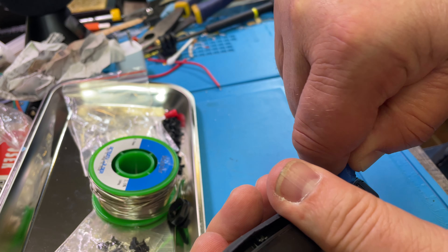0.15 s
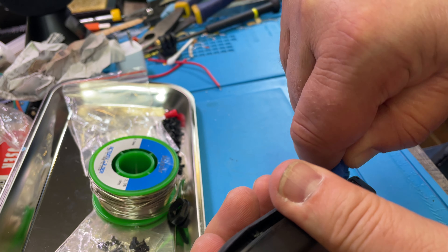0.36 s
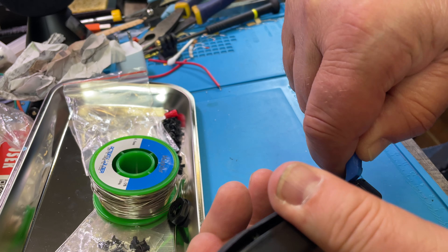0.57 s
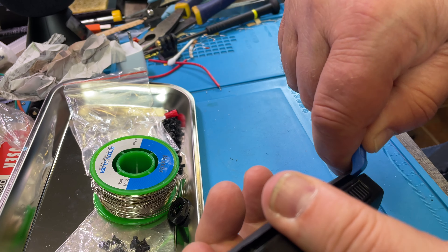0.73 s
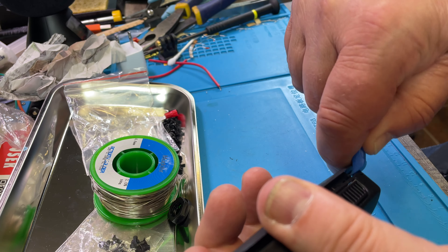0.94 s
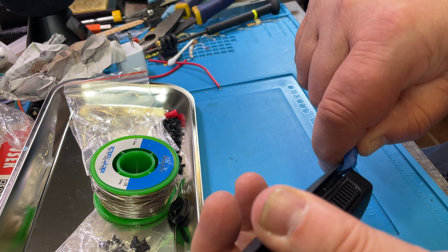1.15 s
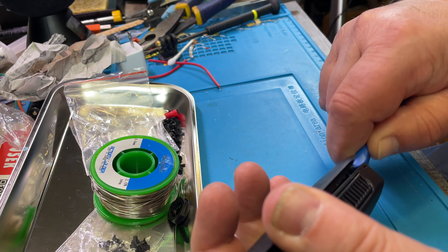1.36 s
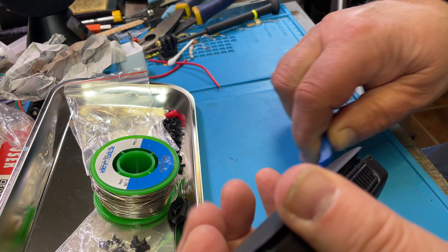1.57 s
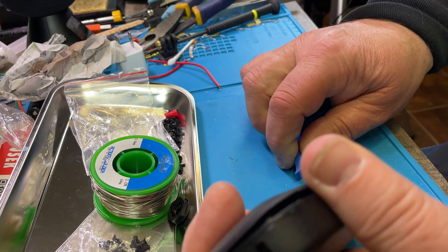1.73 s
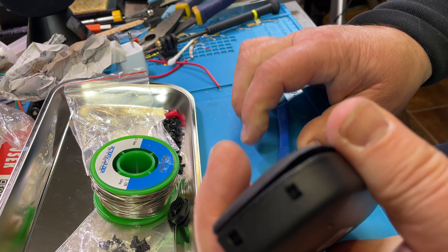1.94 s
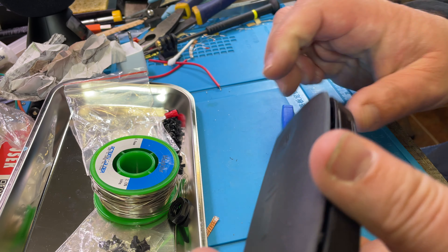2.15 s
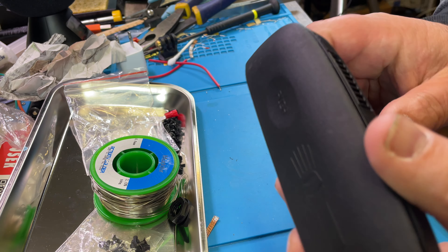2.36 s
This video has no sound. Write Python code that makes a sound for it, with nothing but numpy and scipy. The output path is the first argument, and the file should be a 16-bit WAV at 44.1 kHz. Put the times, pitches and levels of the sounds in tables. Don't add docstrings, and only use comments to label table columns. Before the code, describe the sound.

Close up at a workbench, a plastic case clip cracks loudly, the blade scrapes and slips along the seam in sharp ticks, then the tool drops on the mat and fingers rub and turn the case in a quiet room.

```python
import sys
import numpy as np
from scipy import signal
from scipy.fft import rfft, irfft
from scipy.io import wavfile
from scipy.ndimage import uniform_filter1d

SR = 44100
rng = np.random.default_rng(int(sys.argv[2]) if len(sys.argv) > 2 else 0)


def decibels_to_gain(level_db):
    exponent = np.asarray(level_db, float) / 20
    return 10 ** exponent


def output_pcm(signal):
    pcm = np.clip(np.atleast_2d(signal).T, -1, 1) * 32767
    wavfile.write(sys.argv[1], SR, np.round(pcm).astype(np.int16))


N = 105840
EDGE_S = 0.008


def evened(x):
    return x / np.sqrt(np.mean(x ** 2) + 1e-20)


def read(points, hz):
    f, value = np.transpose(points)
    return np.interp(np.log(hz + 1), np.log(f + 1), value)


def add(mix, start_s, sound):
    part = mix[round(start_s * SR):][:len(sound)]
    part += sound[:len(part)]


def colour(x, points):
    gain = decibels_to_gain(read(points, np.fft.rfftfreq(len(x), 1 / SR)))
    return irfft(rfft(x) * gain, len(x))


def resonate(x, hz, width):
    r = np.exp(-np.pi * width / SR)
    return signal.lfilter([1 - r, 0, r - 1], [1, -2 * r * np.cos(2 * np.pi * hz / SR), r * r], x)


def ring(hz, db, t60, t):
    return decibels_to_gain(db - 60 * t / t60) * np.sin(2 * np.pi * hz * t)


# (frequency [Hz], correlation)
PORT_LIKENESS = [(100, .99), (1000, .8), (5000, .85), (7000, 1.0)]


def air(points, patchy_db):
    frames, hz = N // 256 + 5, np.fft.rfftfreq(1024, 1 / SR)
    a, b, c, d, patches = rng.standard_normal((frames, 513, 5)).T
    patches = evened(uniform_filter1d(uniform_filter1d(patches, 10, 0), 12, 1))
    same = np.clip(read(PORT_LIKENESS, hz), -1, 1)[:, None]
    left = a + 1j * b
    right = same * left + np.sqrt(1 - same ** 2) * (c + 1j * d)
    spectra = np.array([left, right]) * decibels_to_gain(read(points, hz)[:, None] + patchy_db * patches)
    return evened(signal.istft(spectra, nperseg=1024, noverlap=768)[1][:, :N])


# (frequency [Hz], level [dB per Hz])
ROOM_AIR = [(18, -23.5), (30, -6), (145, -1), (221, -17.5), (374, -15.5), (702, -27.5), (9220, -41),
            (13700, -31.5), (16000, -43)]


def room_air():
    return decibels_to_gain(-69.5) * air(ROOM_AIR, patchy_db=2.2)


# (time [s], level [dB])
RUMBLE_LEVEL = [(0, -74), (.06, -78.5), (.17, -64), (.6, -77), (.75, -75.5), (1.03, -75), (1.25, -74.5),
                (1.801, -62.5), (2.15, -63), (2.4, -71.5)]
# (frequency [Hz], level [dB])
RUMBLE_SPECTRUM = [(25, -17.5), (60, -1.5), (120, -8.5), (250, -5), (450, -16.5), (900, -37.5)]


def handling_rumble():
    level_db = np.interp(np.arange(N) / SR, *np.transpose(RUMBLE_LEVEL))
    return decibels_to_gain(level_db) * air(RUMBLE_SPECTRUM, patchy_db=2.6)


# (frequency [Hz], width [Hz], level [dB])
CASE_RESONANCES = [(550, 280, -13), (946, 160, -11), (1297, 200, -0.5), (1604, 340, -1), (1827, 120, -0.5),
                   (2228, 150, -2.5), (2680, 210, -7), (3340, 570, -10), (5080, 410, -17),
                   (7000, 650, -18.5)]


def case(x, widen=1):
    modes = enumerate(CASE_RESONANCES)
    return sum((-1) ** k * decibels_to_gain(db) * resonate(x, hz, width * widen) for k, (hz, width, db) in modes)


# (frequency [Hz], level [dB])
CONTACT_HISS = [(3000, -31), (6000, -6), (8500, -0.5), (10600, 3.5), (12500, -8), (14200, 2.5), (16000, -5)]


def contact_hiss(x):
    return evened(colour(x, CONTACT_HISS))


# (start [s], length [s], level [dB], treble [dB], peak [share of length])
SCRAPE_STROKES = [(.095, 0.086, -69.5, -19, 0.5), (0.205, 0.13, -49, 0, .05),
                  (0.318, 0.17, -60, -1.5, 0.49), (0.463, 0.1085, -56, -4.5, 0.45),
                  (0.543, 0.21, -69, 0.5, 0.85), (0.778, 0.071, -54, -4.5, 0.17),
                  (0.791, 0.082, -52.5, 2, 0.644), (1.057, .18, -60, 2, 0.78),
                  (1.19, 0.094, -46, 1.5, 0.15), (1.285, 0.13, -51, 1.5, 0.424),
                  (1.399, 0.12, -55.5, 2.5, 0.848), (1.484, 0.3, -72.5, 5.5, 0.16),
                  (1.619, 0.0637, -59, 10.5, 0.29), (1.643, 0.13, -72, 6.5, 0.53),
                  (1.762, 0.46, -66.5, 10.5, 0.165), (1.985, 0.22, -60.5, 14, 0.21),
                  (2.096, 0.23, -59, 7, 0.476), (2.248, 0.41, -67.5, 7, 0.21)]


def scrapes():
    grit_per_s, spread_db, judder_db = 9000, 2.5, 2.2
    sag_db, hiss_db = -24.5, -9
    upper_hz, upper_share = 2850, 0.54
    t = np.arange(N) / SR
    grit = decibels_to_gain(spread_db * np.minimum(rng.exponential(1, N), 5)) * (rng.random(N) < grit_per_s / SR)
    grit *= rng.choice([-1, 1], N)
    judder = evened(uniform_filter1d(rng.standard_normal(N), 220))
    grit = evened(grit * decibels_to_gain(judder_db * judder))
    body, upper, hiss = np.zeros((3, N))
    for start, length, db, treble_db, peak in SCRAPE_STROKES:
        u, peak = (t - start) / length, np.clip(peak, .03, .97)
        away = np.where(u < peak, 1 - u / peak, (u - peak) / (1 - peak))
        edges = np.clip(np.minimum(t - start, start + length - t) / EDGE_S, 0, 1)
        push = edges * decibels_to_gain(db + sag_db * np.clip(away, 0, 1) ** 1.41)
        body += push
        upper += push * decibels_to_gain(upper_share * treble_db)
        hiss += push * decibels_to_gain(treble_db)
    lowpass = signal.butter(3, upper_hz, fs=SR, output="sos")
    low_body = signal.sosfiltfilt(lowpass, grit * body)
    high_upper = grit * upper - signal.sosfiltfilt(lowpass, grit * upper)
    through_shell = case(low_body + high_upper) / np.std(case(grit))
    return through_shell + decibels_to_gain(hiss_db) * hiss * contact_hiss(grit)


# (start [s], length [s], level [dB], from [Hz], to [Hz])
EVEN_RUBS = [(.1, 0.081, -69.5, 1850, 1980), (0.106, .072, -74, 2250, 2180),
             (0.097, 0.084, -71.5, 1300, 1383), (0.231, 0.05, -47, 1500, 1250),
             (1.198, 0.01, -48.5, 3270, 3100), (1.235, 0.017, -51, 2220, 2450),
             (1.478, 0.031, -52.5, 2130, 2300), (1.48, 0.011, -69, 3700, 3590),
             (1.836, 0.016, -60, 3200, 3450), (2.023, 0.11, -64.5, 2110, 2300),
             (2.164, .13, -64, 1500, 1440), (2.171, 0.12, -70.5, 2230, 2080),
             (2.162, .08, -69.5, 12800, 13400)]


def rubs():
    width_share = .28
    out = np.zeros(N)
    noises = rng.standard_normal((len(EVEN_RUBS), 8000))
    for (start, length, db, from_hz, to_hz), noise in zip(EVEN_RUBS, noises):
        t = np.arange(0, min(length, .18), 1 / SR)
        slide_hz = from_hz + (to_hz - from_hz) * t / length
        turn = np.exp(2j * np.pi * np.cumsum(slide_hz) / SR)
        r = np.exp(-np.pi * width_share * from_hz / SR)
        band = (turn * signal.lfilter([1], np.poly([r, r]), noise[:len(t)] / turn)).real
        edges = np.clip(np.minimum(t, length - t) / EDGE_S * 2, 0, 1)
        add(out, start, decibels_to_gain(db) * evened(band) * edges)
    return out


# (middle [s], length [s], level [dB], pitch [Hz])
BENCH_GROANS = [
    (.16, 0.08, -59, 172.7),
    (0.539, 0.054, -58, 232.5),
    (0.834, 0.077, -64.5, 307.2),
    (1.283, 0.19, -61.5, 250.3),
    (1.619, 0.15, -68, 245.7),
]


def groans():
    fade_db, waver = -24, .05
    t = np.arange(N) / SR
    wander = evened(uniform_filter1d(uniform_filter1d(rng.standard_normal(N), 900), 900))
    turns = np.cumsum(1 + waver * wander) / SR
    out = np.zeros(N)
    for middle, length, db, hz in BENCH_GROANS:
        swell = decibels_to_gain(db + fade_db * ((t - middle) / length) ** 2)
        out += swell * np.sin(2 * np.pi * hz * turns)
    return out


# (frequency [Hz], level [dB], t60 [s])
SHELL_MODES = [(590, -14, 0.0098), (910, -17.5, 0.02), (1332, -3.5, 0.022), (1605, -4, 0.018),
               (1850, -13, 0.014), (2765, -10, 0.019), (3016, -8.5, 0.016), (3960, -11, 0.012),
               (5010, -17, .014), (5930, -24, .014), (7740, -24.5, 0.03), (11800, -23, 0.008),
               (13330, -17, 0.0092)]


def snap():
    snap_s, blow_lag_s, blow_ms, blow_db = .2191, .00065, .5, -6
    buzz_hz, buzz_s, buzz_db = 2215, .0036, -16
    shell_db, crack_db, crack_t60 = -8, -20.5, 0.075
    crack_hold_s, loose_db = 0.0043, -6
    t, out = np.arange(6000) / SR, np.zeros(N)
    add(out, snap_s, np.minimum(t / 0.00026, 1) * ring(10600, -9, .006, t))
    u = np.minimum(t * 1000 / blow_ms, 1)
    blow = decibels_to_gain(blow_db) * np.sin(2 * np.pi * u)
    buzz_swell = np.sin(np.pi * np.clip(t / buzz_s, 0, 1)) ** 1.3
    buzz = decibels_to_gain(buzz_db) * np.sin(2 * np.pi * buzz_hz * t) * buzz_swell
    modes = enumerate(SHELL_MODES)
    shell = u ** 2 * sum((-1) ** k * ring(hz, db + shell_db, t60, t) for k, (hz, db, t60) in modes)
    rattle_db = np.where(t < crack_hold_s, 0, loose_db - 60 * t / crack_t60)
    crack = decibels_to_gain(crack_db + rattle_db) * rng.standard_normal(len(t))
    add(out, snap_s + blow_lag_s, blow + buzz + shell + crack)
    return out


# (time [s], level [dB], decay [s])
CONTACT_SPITS = [
    (.2192, -27, .0028),
    (1.7468, -57, .002),
    (1.8142, -53, .0014),
]


def spits():
    t, out = np.arange(1200) / SR, np.zeros((2, N))
    band = signal.butter(3, (7400, 10400), "band", fs=SR, output="sos")
    noises = rng.standard_normal((len(CONTACT_SPITS), 2, 1200))
    for (s, db, decay), noise in zip(CONTACT_SPITS, noises):
        thin = signal.sosfilt(band, noise * np.exp(-t / decay))
        for port in range(2):
            add(out[port], s, decibels_to_gain(db) * thin[port])
    return out


THUMP_TIMES = [
    .2225,
    .224,
    .225,
    .241,
    .71,
    .8,
    1.208,
    1.23,
    1.7495,
    1.762,
]
# (frequency [Hz], peak [dB], t60 [s])
THUMP_TONES = [(164.5, -18, 0.057), (244, -33, 0.12), (78, -26, 0.1), (109, -27.5, 0.056),
               (78.7, -49.5, 0.13), (71.34, -55.5, 0.2), (152.5, -38.5, 0.055), (66, -56, 0.41),
               (158.7, -39.5, 0.21), (93.8, -47.5, 0.11)]


def thumps():
    t, out = np.arange(12000) / SR, np.zeros(N)
    for s, (hz, db, t60) in zip(THUMP_TIMES, THUMP_TONES):
        add(out, s, np.minimum(t * hz, 1) * ring(hz, db, t60, t))
    return out


# (time [s], peak [dB], treble [dB], thud [dB], ring [Hz])
BLADE_TICKS = [(0.2706, -46, -19.5, -25, 1300), (0.4099, -49.5, -8.5, -9, 2830),
               (0.5025, -47.5, -7.5, -14.5, 1333), (0.5287, -44.5, -14, -10, 1300),
               (0.7042, -45.5, -6, -23, 1400), (0.7901, -50.5, -4, -26, 1403),
               (1.0395, -59.5, -11.5, -23, 2230), (1.1553, -48, -19, -9, 1340),
               (1.2072, -33.5, 2, -11.5, 1430), (1.208, -28.5, -7, -14, 2340),
               (1.2115, -30, -6.5, -34, 1510), (1.2147, -37, 2, -9, 1510), (1.2194, -32, -23, -23, 1965),
               (1.2285, -38.5, -18.5, -4, 2250), (1.3214, -46.5, -21, -27, 2460),
               (1.332, -55, -16, -22, 1540), (1.3439, -30.5, -10, -16, 1550), (1.3472, -49, -15, -33, 2200),
               (1.361, -40.5, -11, -2.5, 1520), (1.368, -43, -16, -20, 1600), (1.384, -52, -8, -3, 3190),
               (1.4526, -43, -12, -40, 1600), (1.4825, -50, -14, -24, 2320),
               (1.4880, -42.5, -8.5, -8, 1560), (1.4948, -41.5, -10, -19, 2120),
               (1.5007, -39, -16, -21, 2160), (1.5045, -55, -12, -6, 2300), (1.6325, -52, -10, -16, 1522)]


def ticks():
    rise_s, decay_s, widen = .0004, 0.00059, 1.2
    ring_db, ring_t60 = 3, 0.012
    t, out = np.arange(1500) / SR, np.zeros(N)
    rise = np.minimum(t / rise_s, 1)
    shape = rise * np.exp(-t / decay_s)
    noises = rng.standard_normal((len(BLADE_TICKS), 1500))
    for (s, db, treble_db, thud_db, hz), noise in zip(BLADE_TICKS, noises):
        body = case(noise * shape, widen)
        body = body / abs(body).max() + rise * ring(hz, ring_db, ring_t60, t)
        fizz = decibels_to_gain(treble_db) * contact_hiss(noise) * shape
        thud = ring(550, thud_db, 0.015, t)
        add(out, s, decibels_to_gain(db) * (body / abs(body).max() + fizz + thud))
    return out


# (time [s], peak [dB], hardness [dB per octave])
MAT_KNOCKS = [
    (1.7475, -23.5, 0.5),
    (1.7748, -35.5, 1.4),
    (1.851, -39.5, -16),
    (1.956, -51.5, -12.5),
    (2.033, -40, -19),
    (2.146, -48.5, -21),
    (2.227, -51.5, -19),
    (2.269, -54.5, -27),
]
# (frequency [Hz], level [dB], t60 [s])
MAT_MODES = [(262, -2, 0.0284), (402, -4, 0.021), (551.6, -1.5, 0.0252), (925, -2, 0.024),
             (1448, 5, 0.0148), (1730, -2.5, 0.014), (2130, -6, 0.015), (2540, -9, 0.014),
             (3450, -11.5, 0.009), (5050, -15, 0.012), (7170, -25, 0.013)]


def knocks():
    rise_s, scatter, slap_db, slap_s = .0008, .008, -12.5, 0.00085
    t, out = np.arange(4000) / SR, np.zeros(N)
    noises = rng.standard_normal((len(MAT_KNOCKS), 4000))
    for (s, db, hard_db), noise in zip(MAT_KNOCKS, noises):
        hit = np.zeros(len(t))
        for detune, (hz, mode_db, t60) in zip(noise, MAT_MODES):
            treble_db = hard_db * max(np.log2(hz / 600), 0)
            hit += ring(hz * (1 + scatter * detune), mode_db + treble_db, t60, t)
        hit *= np.minimum(t / rise_s, 1)
        dull = uniform_filter1d(uniform_filter1d(noise, size=4), size=4)
        slap = decibels_to_gain(slap_db + 7.5 * hard_db) * dull * np.exp(-t / slap_s)
        add(out, s, decibels_to_gain(db) * (hit / abs(hit).max() + slap))
    return out


# (frequency [Hz], level [dB], t60 [s])
FLICK_MODES = [(2640, -4.5, 0.0098), (5400, -3, 0.0046), (6060, -7.5, 0.0077), (10600, -9, .007)]


def flick():
    t, out = np.arange(1500) / SR, np.zeros(N)
    click = np.diff(rng.standard_normal(len(t) + 1)) * np.exp(-t / 0.00083)
    rings = sum(ring(*mode, t) for mode in FLICK_MODES)
    add(out, 1.8140, decibels_to_gain(-37.5) * np.minimum(t / 0.00057, 1) * (click + rings))
    return out


# (frequency [Hz], t60 [s])
ROOM_DECAY = [(200, 0.28), (1500, 0.1), (5000, 0.09), (14000, .1)]


def room(x):
    wide_hz = 5000
    taps = np.zeros((2, SR // 2))
    spots = np.arange(100, SR // 2 - 20, 20)
    at = spots + rng.integers(0, 20, (2, len(spots)))
    np.put_along_axis(taps, at, rng.choice([-1., 1.], at.shape), 1)
    hz, t, z = signal.stft(taps, SR, nperseg=256)
    tail = signal.istft(z * decibels_to_gain(-60 * t / read(ROOM_DECAY, hz)[:, None]), SR, nperseg=256)[1]
    lowpass = signal.butter(6, wide_hz, fs=SR, output="sos")
    tail = tail[0] + signal.sosfilt(lowpass, tail - tail[0])
    return signal.fftconvolve(x[None], tail / np.linalg.norm(tail[0]), axes=1)[:, :N]


def scene():
    near = scrapes() + rubs() + ticks() + snap() + thumps() + knocks() + flick() + groans()
    return near + decibels_to_gain(-16) * room(near) + room_air() + handling_rumble() + spits()


# (frequency [Hz], lead [rad])
PORT_LEAD = [(100, .12), (1200, 1.3), (1800, 1.6), (3300, 1.6), (4500, 1.1), (5400, 1.5), (6600, -1.2),
             (8000, -2.8), (9900, -3.6), (11800, -5.4), (13000, -6.0), (16000, -6.9)]
# (frequency [Hz], difference [dB])
PORT_TILT = [(60, 1), (170, 2.5), (350, 0), (1400, 5), (3000, 2), (5500, 3.5), (7500, -.6), (15000, -1)]
# (frequency [Hz], level [dB])
MIC_TOP = [(15200, 0.5), (15800, -16), (16800, -16.5)]


def microphone(dry):
    hz, side = np.fft.rfftfreq(N, 1 / SR), np.array([[.5], [-.5]])
    f, lead = np.transpose(PORT_LEAD)
    phase = np.exp(1j * side * np.interp(hz, f, lead))
    level = decibels_to_gain(side * read(PORT_TILT, hz) + read(MIC_TOP, hz))
    return irfft(rfft(dry) * phase * level * (hz < 16800), N)


def top_cut(x):
    return signal.sosfilt(signal.butter(12, 16810, fs=SR, output="sos"), x)


def record(dry):
    mix = microphone(dry)
    return top_cut(mix)


dry = scene()
out = record(dry)
output_pcm(out)
```